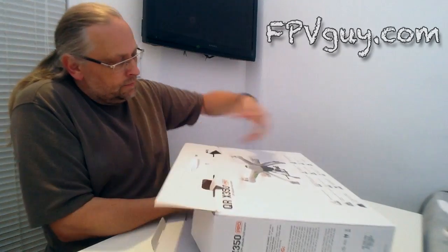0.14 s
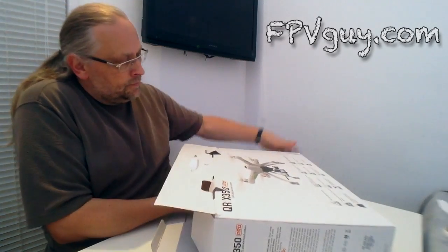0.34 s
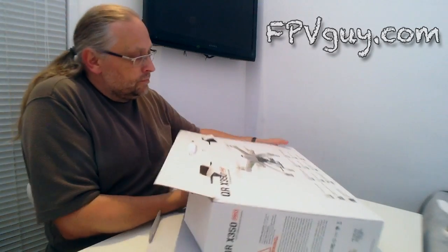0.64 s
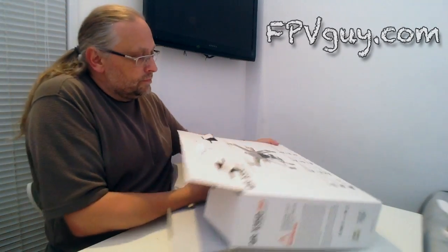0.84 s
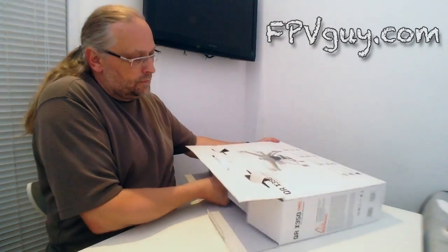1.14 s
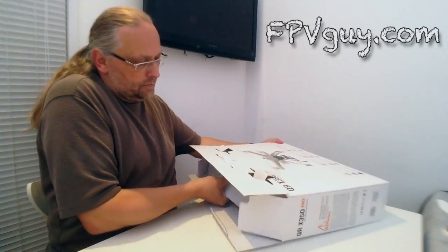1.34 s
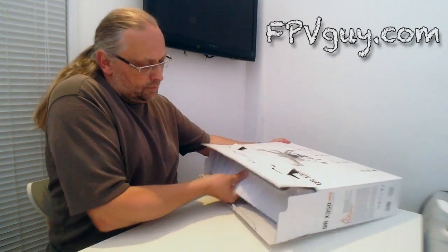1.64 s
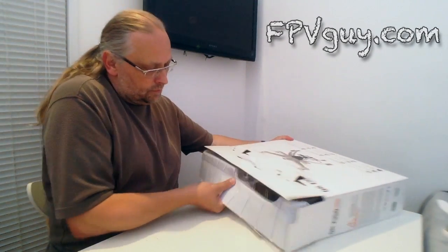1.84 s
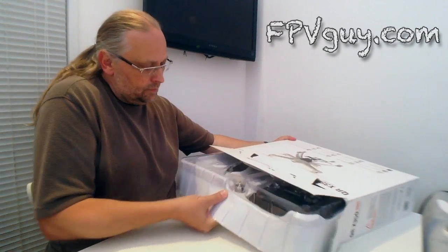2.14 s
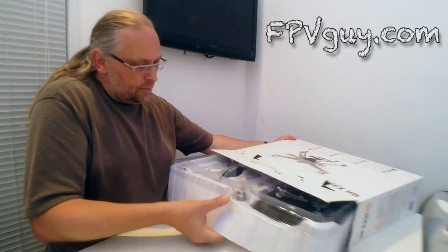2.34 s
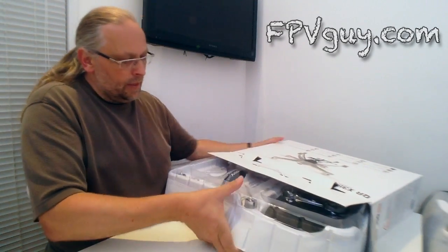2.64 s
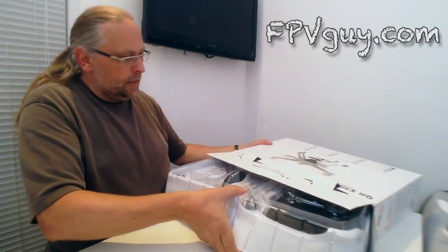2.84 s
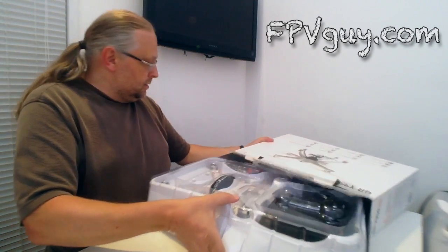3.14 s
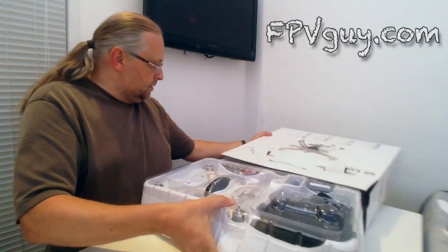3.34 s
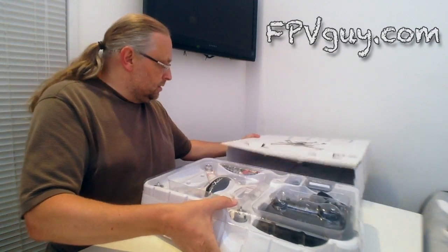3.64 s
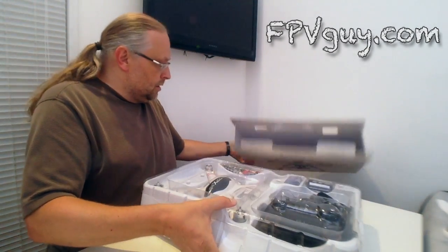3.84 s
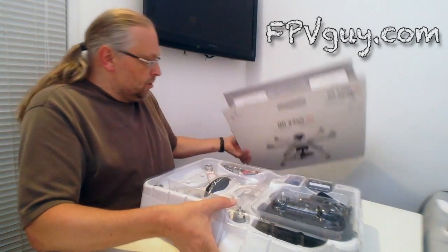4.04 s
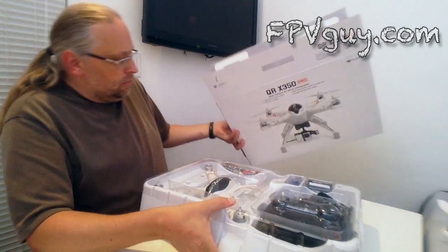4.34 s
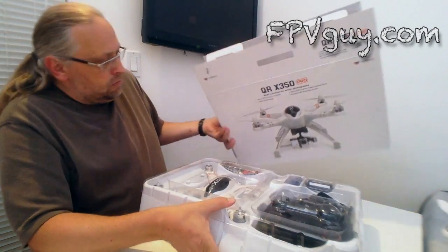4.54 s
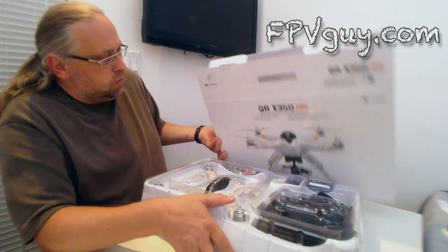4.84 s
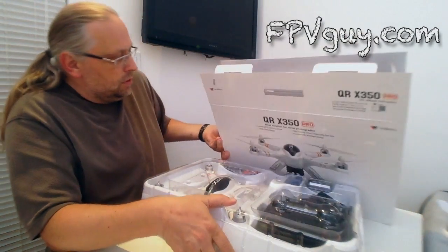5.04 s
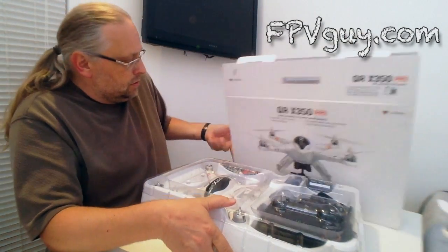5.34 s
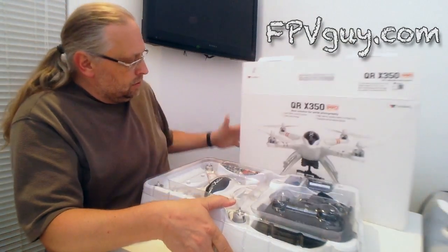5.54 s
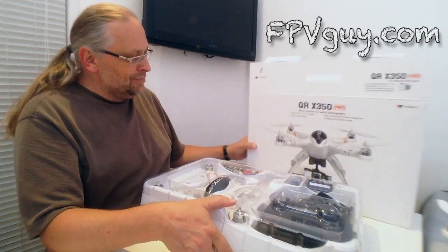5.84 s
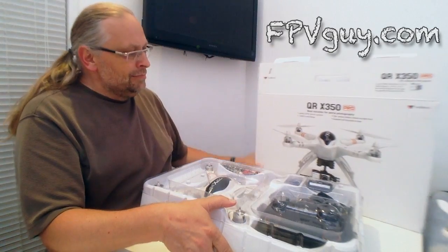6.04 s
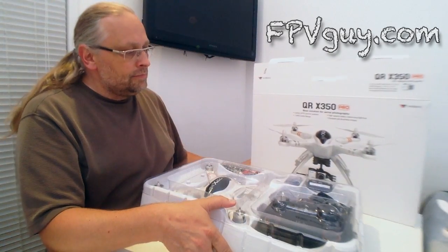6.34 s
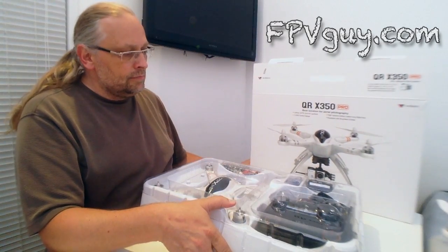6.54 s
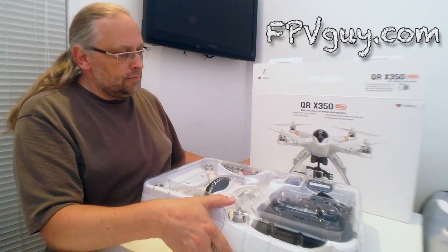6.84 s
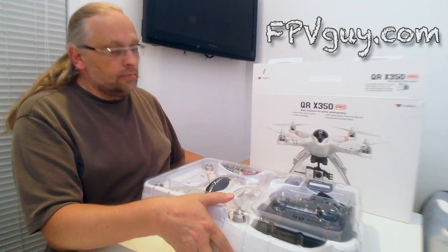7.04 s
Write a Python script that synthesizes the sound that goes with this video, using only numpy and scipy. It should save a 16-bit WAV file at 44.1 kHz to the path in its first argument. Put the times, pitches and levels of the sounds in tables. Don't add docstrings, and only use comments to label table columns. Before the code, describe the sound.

Hands knock a cardboard box, drag a plastic tray out with scraping and clatter, then thump the empty box down and squeak it along a wall.

```python
import sys
import numpy as np
from scipy import signal
from scipy.fft import rfft, irfft, next_fast_len
from scipy.io import wavfile
from scipy.ndimage import uniform_filter1d, map_coordinates

SR = 44100
rng = np.random.default_rng(int(sys.argv[2]) if len(sys.argv) > 2 else 0)


def gain_from_decibels(decibels):
    exponent = np.asarray(decibels, float) / 20
    return 10 ** exponent


def transcribe(u):
    v = np.clip(np.atleast_2d(u).T, -1, 1)
    q = np.round(v * 32767).astype(np.int16)
    wavfile.write(sys.argv[1], SR, q)


N = 316637

# t/s, peak level/dB, panel note f/Hz, hardness/0-1
FLAP_KNOCKS = [
    (0.05, -17, 412, 0.64),
    (0.306, -23.5, 343, 0.75),
    (0.497, -13.5, 330, 0.44),
    (0.573, -2, 550, 0.82),
    (0.641, -2, 571, 0.78),
    (0.714, -15.5, 510, 0.86),
    (0.948, -12.5, 241, 0.1),
    (0.955, -19, 830, .1),
    (1.101, -15, 525, 0.5),
    (1.122, -11.5, 903, 0.37),
]
# t/s, peak level/dB, panel note f/Hz, hardness/0-1
TRAY_KNOCKS = [(1.391, -17.5, 250, .2), (1.509, -18.5, 663, 0.65), (1.862, -9, 670, 0.37),
               (1.792, -5, 382, 0.2), (1.983, -9, 690, 0.31), (2.047, -10.5, 665, 0.45),
               (2.079, -9.5, 607, 0.56), (2.265, -3.5, 1050, 0.79), (2.482, -18, 700, 0.53),
               (2.581, 0, 557, 0.055), (2.637, 0, 566, 0.38), (2.678, -3.5, 912, 0.85),
               (2.73, -14, 700, 0.42), (2.874, -22.5, 940, 0.3), (2.935, -10.5, 1000, .4),
               (2.98, -14, 890, 0.67), (3.024, -12, 974, 0.43), (2.53, -22, 492, 0.067),
               (3.066, -28, 897, 0.27), (3.093, -10, 560, .3), (3.117, -15, 300, 0.43),
               (3.349, -4.5, 368, .4), (3.17, -4, 300, .35), (3.185, -4.5, 404, 0.57),
               (3.199, -1.5, 1008, 0.58), (3.28, -13, 780, 0.88), (3.308, -14.5, 497, 0.81),
               (3.559, -9, 305, 0.33)]
# t/s, peak level/dB, panel note f/Hz, hardness/0-1, t60/s
BOX_KNOCKS = [(4.089, -21, 339, 0.26, 0.098), (4.202, -29.5, 382, 0, 0.16), (4.462, -17, 376, 0.66, 0.065),
              (4.704, 0, 361, .5, 0.051), (4.711, 5.5, 492, 0.57, 0.025), (4.749, -7.5, 375, 0.68, 0.12),
              (4.82, -14, 584, .3, 0.069), (4.981, 6.5, 659, 0.49, 0.19), (5.014, 4.5, 420, .3, .07),
              (5.363, -18, 358, 0.56, 0.066), (5.377, -3.5, 333, 0.34, 0.043),
              (5.593, -8.5, 330, 0.25, 0.12), (5.719, -22, 216.2, 0.47, 0.48),
              (5.9, -4, 299.4, 0.57, 0.042), (5.992, -0.5, 367, .3, 0.12), (6.236, -24, 354, .1, 0.056),
              (6.872, -39.5, 237, 0.84, 0.039)]
SOFT_RATTLE_DB, HARD_RATTLE_DB = -39, 3


def unit(x):
    return x / np.sqrt(np.mean(x ** 2) + 1e-20)


def along(points, hz):
    f, v = np.transpose(points)
    return np.interp(np.log(hz + 1), np.log(f + 1), v)


def wobble(rate):
    coarse = np.arange(0, N + 16, 16)
    knots = rng.standard_normal(int(N * rate / SR) + 4)
    return np.interp(np.arange(N), coarse, map_coordinates(knots, [coarse * rate / SR]))


def filtered(x, response):
    m = next_fast_len(len(x) + 8192)
    return irfft(rfft(x, m) * response(np.fft.rfftfreq(m, 1 / SR)), m)[:len(x)]


def peak(f, hz, width):
    return 1j * f * width / (hz * hz - f * f + 1j * f * width)


def knocks(count=26):
    flap_t60_s, tray_t60_s = 0.058, 0.051
    soft_fall_db, hard_fall_db = 27, 5.5
    out = np.zeros(N + SR)
    t = np.arange(SR // 5) / SR
    blows = [(*row, flap_t60_s) for row in FLAP_KNOCKS]
    blows += [(*row, tray_t60_s) for row in TRAY_KNOCKS]
    blows += [tuple(row) for row in BOX_KNOCKS]
    chance = rng.standard_normal((len(blows), 3, count))
    noise = rng.standard_normal((len(blows), len(t)))
    for (s, db, note_hz, hard, t60), (detune, uneven, sign), hiss in zip(blows, chance, noise):
        fall_db = soft_fall_db + hard * (hard_fall_db - soft_fall_db)
        rattle_db = SOFT_RATTLE_DB + hard * (HARD_RATTLE_DB - SOFT_RATTLE_DB)
        hz = np.geomspace(214, 1488, count) * (1 + 0.021 * detune)
        hz[np.argmin(np.abs(hz - note_hz))] = note_hz
        octaves = np.log2(hz / note_hz) * np.where(hz < note_hz, 2.4, 1)
        level = -fall_db * np.abs(octaves) ** 0.7 + 2.5 * uneven * (hz != note_hz)
        level = level - 22 * np.log2(np.maximum(hz / 980, 1))
        mode_t60 = t60 * (note_hz / hz[:, None]) ** 0.086
        life = gain_from_decibels(level[:, None] - 60 * t / mode_t60)
        polarity = np.sign(sign + 1.2 - np.abs(octaves))[:, None]
        walls = np.sum(life * polarity * np.sin(2 * np.pi * hz[:, None] * t), axis=0)
        rattle = hiss * gain_from_decibels(-60 * t / (0.63 * t60)) * (1 - np.exp(-t / 0.0033))
        rattle = filtered(rattle, lambda f: peak(f, 1400, 910) * peak(f, 1800, 4300))
        blow = walls / np.abs(walls).max() + gain_from_decibels(rattle_db) * rattle / np.abs(rattle).max()
        attack_s = 0.00065 + 0.0021 * max(1 - hard, 0) ** 2
        contact = 0.44 + 1.02 * hard * np.exp(-t / 0.0044)
        strike = (1 - np.exp(-t / attack_s)) * contact
        out[round(s * SR):][:len(t)] += gain_from_decibels(db) * blow * strike
    return out[:N]


def thuds():
    # t/s, peak level/dB, f/Hz, t60/s
    landings = [(0.058, -25, 158, 0.073), (0.5, -21.5, 82, 0.073), (0.949, -29, 68, 0.086),
                (1.123, -23, 144, 0.085), (1.382, -29, 169, 0.058), (2.263, -14, 154, 0.077),
                (2.682, -40, 159, 0.06), (3.178, -16, 203, 0.075), (3.288, -28, 144, 0.092),
                (3.571, -30, 146.4, 0.15), (3.843, -31, 108.5, 0.19), (4.091, -41, 113, 0.18),
                (4.748, -20, 209, 0.099), (4.884, -9, 74.6, 0.045), (4.986, -3, 91, 0.057),
                (5.379, -9, 88, 0.072), (5.595, -15, 94, 0.12), (5.72, -19, 116, 0.15),
                (5.903, -5.5, 85.5, 0.11)]
    out = np.zeros(N + SR)
    t = np.arange(SR // 3) / SR
    for s, db, hz, t60 in landings:
        note = np.sin(2 * np.pi * hz * t) + 0.6 * np.sin(2 * np.pi * 1.816 * hz * t)
        fade = gain_from_decibels(db + 0.5 - 60 * t / np.clip(t60, 0.02, 0.6))
        out[round(s * SR):][:len(t)] += fade * note * (1 - np.exp(-t / 0.0053))
    return out[:N]


def effort():
    # t at full speed/s, held/s, fibre level/dB, weight (panel over fibre)/dB
    strokes = [(0.0, 0.14, -40.5, 3.5), (.2, 0.47, -54.5, 10), (.8, 0.076, -42, -25), (0.948, 0.39, -39, 1),
               (1.31, 0.33, -42.5, 3.5), (1.658, 0.083, -30, -2.5), (1.801, 0.18, -24, -5.5),
               (2.05, 0.3, -36.5, 2.5), (2.3, 0.026, -33, 2.5), (2.445, 0.036, -32, -10),
               (2.52, 0.16, -40, 6.5), (2.78, 0.042, -42, -18), (2.9, 0.23, -41.5, 8),
               (3.134, 0.02, -25.5, 11), (3.199, 0.16, -22, 1), (3.471, .11, -33, 2.5),
               (3.75, 0.092, -57.5, 12), (3.9, 0.054, -49, -1), (3.992, 0.054, -42, 4.5),
               (4.1, 0.025, -62, 15), (4.2, 0.32, -58, 11), (4.459, 0.031, -46, 9.5),
               (4.92, 0.12, -41, 6.5), (5.4, 0.045, -47.5, 11.5), (5.66, 0.34, -49, 7),
               (5.988, 0.037, -34.5, 4), (6.2, 0.26, -49.5, -9), (6.68, 0.095, -58, 5),
               (6.82, 0.19, -78, 22), (7.12, .06, -64.5, 3)]
    speed_up_db_s, slow_down_db_s = 281, 140.5
    edge_db, edge_weight, table_db, table_weight = -19, 0.13, -17, 1
    shake_db, shake_t60_s, shake_fibre_db = -21.5, 0.28, -3
    t = np.arange(0, N + 128, 128) / SR
    power = 0
    for s, held_s, db, weight_db in strokes:
        swell_db = speed_up_db_s * np.maximum(s - t, 0)
        fade_db = slow_down_db_s * np.maximum(t - s - held_s, 0)
        speed_db = db - swell_db - fade_db
        parts_db = [weight_db, 0, edge_db + edge_weight * weight_db, table_db + table_weight * weight_db]
        power = power + gain_from_decibels(2 * np.add.outer(parts_db, speed_db))
    for s, db, _, hard, *_ in [*FLAP_KNOCKS, *TRAY_KNOCKS, *BOX_KNOCKS]:
        shiver_db = np.where(t > s, db + shake_db - 60 * (t - s) / shake_t60_s, -200)
        bright_db = shake_fibre_db + SOFT_RATTLE_DB * (1 - hard)
        power = power + gain_from_decibels(2 * np.add.outer([0, bright_db, bright_db + 1, -12], shiver_db))
    return [np.interp(np.arange(N) / SR, t, gain) for gain in np.sqrt(power)]


def friction(spectrum, slip_db, catch_db, patchy_db, jerk_db):
    catches = gain_from_decibels(catch_db * rng.exponential(size=N // 40 + 1)).repeat(40)[:N]
    x = rng.standard_normal(N) * catches * gain_from_decibels(slip_db * (wobble(35) + wobble(130)) + jerk_db)
    z = signal.stft(x, nperseg=1024)[2]
    field = uniform_filter1d(uniform_filter1d(rng.standard_normal(z.shape), 3, 0), 5, 1)
    x = signal.istft(z * gain_from_decibels(patchy_db * unit(field)), nperseg=1024)[1][:N]
    x = filtered(x, lambda hz: gain_from_decibels(along(spectrum, hz)))
    return x / np.sqrt(np.abs(uniform_filter1d(x ** 2, SR // 4)) + 1e-20)


def rubbing():
    # f/Hz, level per Hz/dB
    panel_colour = [(88, -42.5), (150, -14), (248, -8), (286, -5.5), (446, -10.5), (481, -7), (972, -13.5),
                    (1270, -24.5), (1500, -24.5), (1950, -38), (3300, -120)]
    # f/Hz, level per Hz/dB
    fibre_colour = [(1470, -1), (2500, -4), (2700, -3.5), (4310, -1.5), (5310, -4.5), (7890, 2),
                    (10300, -10.5), (11700, -7.5), (14000, -12), (15350, -20), (15600, -63)]
    # f/Hz, level per Hz/dB
    edge_colour = [(900, -26.5), (1300, 1), (2000, 7), (2800, -3), (4000, -11.5)]
    # f/Hz, level per Hz/dB
    table_colour = [(40, -5), (75, 4.5), (170, 18), (260, -47)]
    panel_gain, fibre_gain, edge_gain, table_gain = effort()
    jerk = wobble(28) + 0.82 * wobble(75)
    panel = friction(panel_colour, slip_db=1.5, catch_db=0.17, patchy_db=3.5, jerk_db=1.7 * jerk)
    fibre = friction(fibre_colour, slip_db=0.16, catch_db=0.7, patchy_db=1.3, jerk_db=1.0 * jerk)
    edge = friction(edge_colour, slip_db=2.9, catch_db=-1.0, patchy_db=2.0, jerk_db=0.52 * jerk)
    table = friction(table_colour, slip_db=-1.0, catch_db=-9.5, patchy_db=1.5, jerk_db=0.67 * jerk)
    return panel_gain * panel + fibre_gain * fibre + edge_gain * edge + table_gain * table


def squeak():
    # t/s, level/dB
    push = [
        (5.88, -84),
        (5.91, -41.5),
        (5.99, -30),
        (6.03, -23),
        (6.1, -27.5),
        (6.2, -48.5),
        (6.25, -81),
    ]
    # f/Hz, width/Hz, level/dB
    modes = [(2250, 270, 0.5), (4960, 410, 7), (5420, 4800, 4.5), (8300, 1000, -14), (12600, 5400, -18.5)]
    s, db = np.transpose(push)
    level_db = np.interp(np.arange(N) / SR, s, db)
    skid = rng.standard_normal(N) * gain_from_decibels(1.5 * wobble(90))
    song = filtered(skid, lambda f: sum(gain_from_decibels(gain) * peak(f, hz, width) ** 2 for hz, width, gain in modes))
    return gain_from_decibels(level_db) * unit(song)


def ticks():
    # t/s, peak level/dB, centre f/Hz
    tray_ticks = [(0.1053, -21, 8450), (1.33, -23, 12000), (0.308, -23.5, 7640), (0.3945, -40, 7830),
                  (0.4553, -27, 6800), (0.518, -27, 6000), (0.5599, -13, 6860), (0.5752, -1, 7700),
                  (0.6434, -9, 3200), (1.1019, -18.5, 5150), (1.795, -5, 8500), (1.8035, -5.5, 7340),
                  (1.83, -8, 6860), (1.8864, -20, 7600), (1.9874, -24, 8100), (2.266, -4, 4530),
                  (2.3192, -13.5, 7860), (2.344, -15, 7500), (2.4834, -9.5, 4060), (2.5575, -17.5, 7200),
                  (2.5791, -9, 2930), (2.6363, -20, 7660), (2.6794, -3, 2760), (2.8764, -25.5, 3960),
                  (2.9366, -15, 4500), (2.983, -11.5, 4180), (3.021, -22, 3730), (3.0464, -21, 4020),
                  (3.0678, -15, 3670), (3.1003, -15, 3900)]
    # t/s, peak level/dB, centre f/Hz
    box_ticks = [(3.7813, -31, 7460), (3.8187, -37, 7620), (3.995, -21, 6900), (4.2009, -34.5, 6810),
                 (4.268, -35, 8810), (4.384, -26, 11900), (4.4166, -32, 7740), (4.446, -21, 6800),
                 (4.7066, -10, 3700), (4.7507, -16, 7460), (4.817, -15.5, 4480), (4.8282, -15, 6640),
                 (4.922, -19, 7650), (4.9302, -16, 6900), (4.982, -16.5, 7800), (5.3632, -38, 3190),
                 (5.3802, -29.5, 7500), (5.5947, -28.5, 7460), (5.6575, -15, 6700), (5.777, -27.5, 7600),
                 (5.901, -25, 5190), (6.7345, -28, 12900), (6.7355, -28.5, 6640), (6.8734, -44, 11900),
                 (6.957, -43, 6000), (7.0738, -58, 3130)]
    tray_t60_s, box_t60_s = 0.011, 0.013
    out = np.zeros(N + SR)
    t = np.arange(SR // 24) / SR
    snaps = [(*row, tray_t60_s) for row in tray_ticks] + [(*row, box_t60_s) for row in box_ticks]
    for (s, db, centre_hz, t60), noise in zip(snaps, rng.standard_normal((len(snaps), len(t)))):
        def colour(f):
            note = peak(f, centre_hz, 0.25 * centre_hz)
            click = peak(f, 0.7 * centre_hz, 1.2 * centre_hz) ** 2 * peak(f, 5100, 9000)
            return note + 0.55 * click

        puff = noise * gain_from_decibels(-60 * t / (1.6 * t60)) * (1 - np.exp(-t / (0.049 * t60)))
        puff = filtered(puff, colour)
        out[round(s * SR):][:len(t)] += gain_from_decibels(db - 3.5) * puff / np.abs(puff).max()
    return out[:N]


def room(x):
    # f/Hz, t60/s
    decay = [(100, 0.35), (500, 0.49), (1500, 0.59), (4000, 0.3), (10000, 0.42)]
    out = np.zeros(N + SR)
    step = SR // 4
    for start in range(0, N, step):
        hz, t, z = signal.stft(rng.standard_normal(SR * 3 // 5), SR, nperseg=256)
        fade = gain_from_decibels(-60 * t / along(decay, hz)[:, None])
        tail = signal.istft(z * fade, SR, nperseg=256)[1]
        wet = signal.fftconvolve(x[start:start + step], tail / np.linalg.norm(tail))
        out[start + 180:][:len(wet)] += wet
    return out[:N]


def background():
    # f/Hz, rms level/dB
    motors = [(54.706, -53), (58.974, -53), (117.97, -58), (236.1, -63)]
    # f/Hz, level per Hz/dB
    air_colour = [(15, -36), (25, -29), (64, 2), (185, -4.5), (229, -2), (285, -8.5), (695, -15.5),
                  (1520, -27.5), (7710, -29.5), (15300, -50), (15700, -83)]
    t = np.arange(N) / SR + 0.002
    hum = 0
    for hz, db in motors:
        waver_db = 1.5 * wobble(1.3) * (hz > 100)
        hum = hum + gain_from_decibels(db + 5 + waver_db) * np.cos(2 * np.pi * hz * t)
    air = filtered(rng.standard_normal(N), lambda hz: gain_from_decibels(along(air_colour, hz)))
    return hum + gain_from_decibels(-51) * unit(air)


def scene():
    knock, thud, tick = knocks(), thuds(), ticks()
    rub = rubbing() + squeak()
    wet = room(gain_from_decibels(-2.0) * knock + gain_from_decibels(-3.0) * thud + gain_from_decibels(-4.0) * tick + gain_from_decibels(-9.5) * rub)
    return (knock + thud + tick + rub + wet + background())[None]


def low_pass(x):
    return signal.sosfilt(signal.butter(12, 16140, fs=SR, output="sos"), x)


def record(dry):
    def bass_cut(f):
        return (1j * f / 40) ** 2 / (1 + 1.4j * f / 40 - (f / 40) ** 2)

    def top_cut(f):
        return 1 / np.sqrt(1 + (f / 15300) ** 140)

    x = filtered(dry[0], lambda f: bass_cut(f) ** 2 * top_cut(f))
    x = x / (1 + np.abs(x / 1.02) ** 12) ** (1 / 12)
    return low_pass(x[None])


dry = scene()
out = record(dry)
transcribe(out)
```